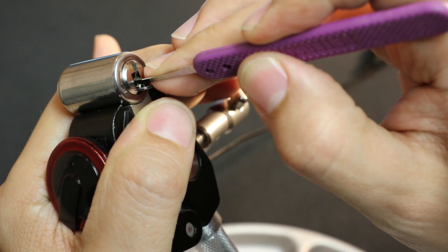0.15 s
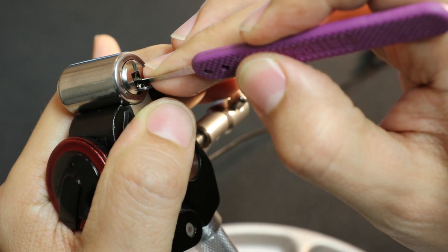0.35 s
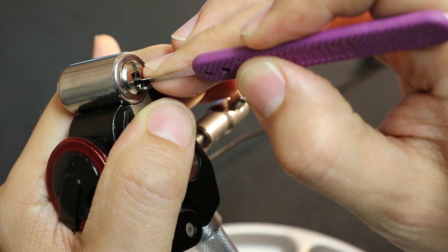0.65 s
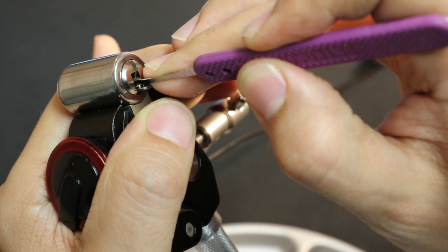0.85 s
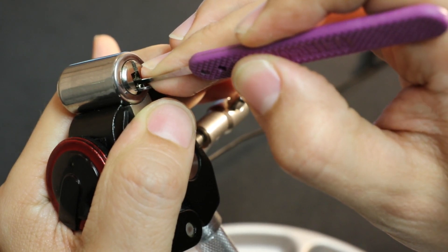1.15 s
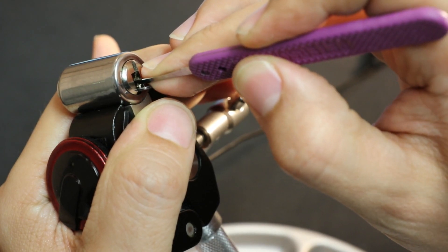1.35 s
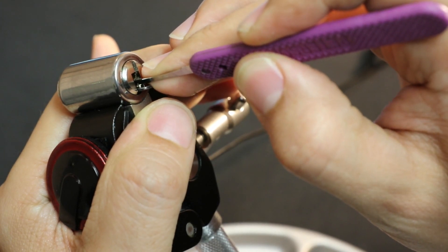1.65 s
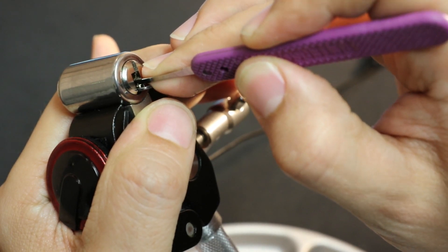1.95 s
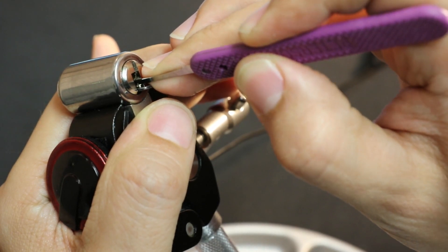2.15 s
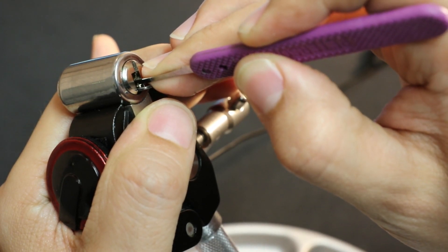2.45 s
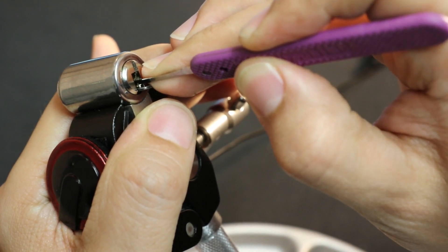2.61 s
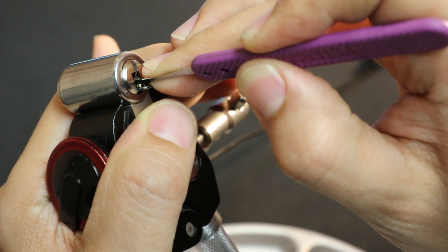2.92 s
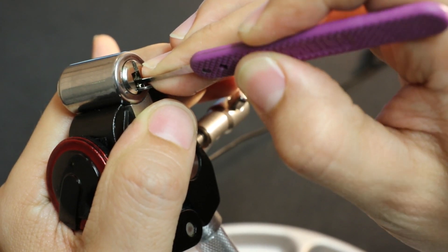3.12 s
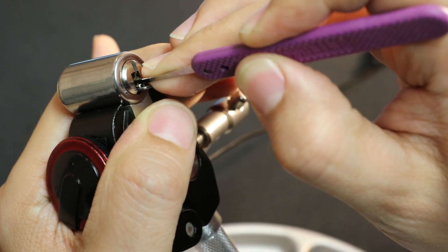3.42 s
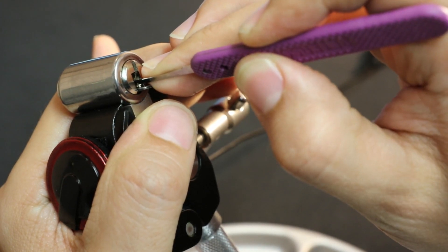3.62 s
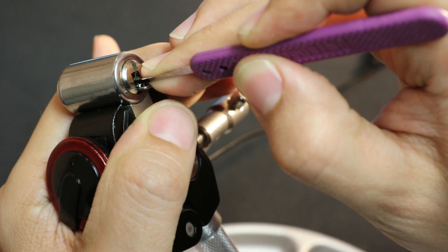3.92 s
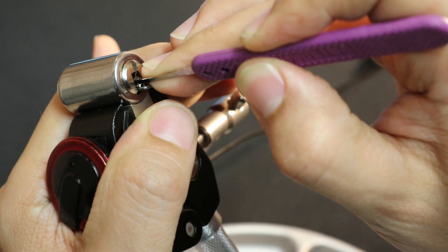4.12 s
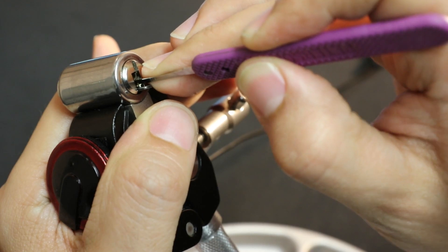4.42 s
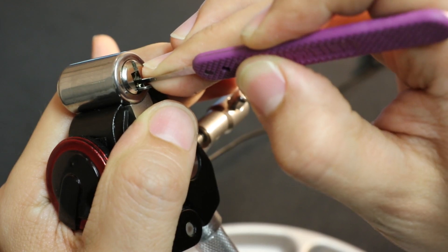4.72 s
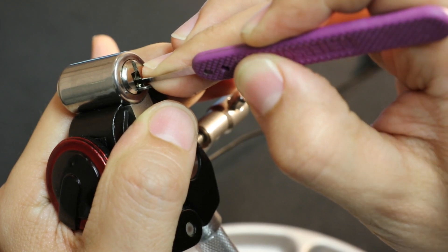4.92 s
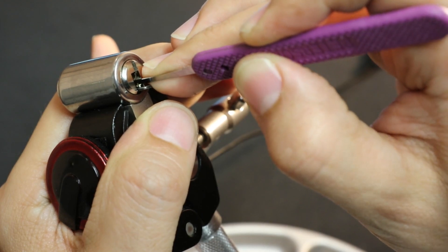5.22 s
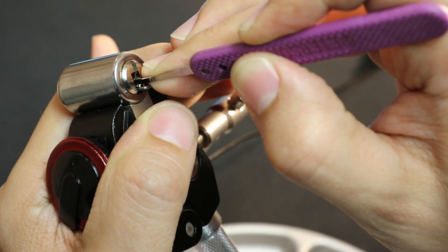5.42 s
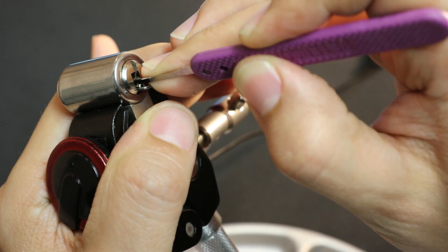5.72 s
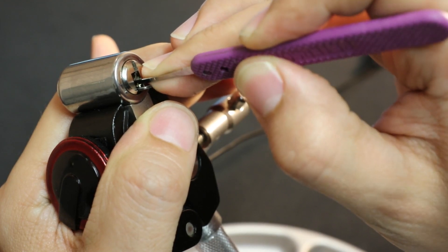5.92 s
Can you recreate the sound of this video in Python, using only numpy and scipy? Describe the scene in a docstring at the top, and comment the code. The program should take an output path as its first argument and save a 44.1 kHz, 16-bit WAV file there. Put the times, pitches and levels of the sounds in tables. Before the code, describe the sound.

A metal pick works a small lock: sharp little snaps, soft ticks and brief scratchy rubs over faint hiss and low mains hum.

```python
"""Sharp little snaps, soft ticks and brief rubs stand out over faint hiss and mains hum.
A hook pick lifts the pins of a small hand-held cylinder lock: each snap rings pick and metal parts as decaying sines.
Light touches ring the pick alone, and filtered random grains make the rubs and scratches in the keyway.
A close mono microphone hears the dull ring; a farther stereo pair adds the bright snap and the room a moment later.
"""
import sys
import numpy as np
from scipy import signal
from scipy.fft import rfft, irfft, next_fast_len
from scipy.io import wavfile

SR = 44100
rng = np.random.default_rng(int(sys.argv[2]) if len(sys.argv) > 2 else 0)


def persist_wave(psi):
    """Save psi, clipped to +-1, as 16-bit WAV."""
    counts = np.round(np.clip(psi, -1, 1) * 32767).astype(np.int16)
    wavfile.write(sys.argv[1], SR, np.atleast_2d(counts).T)


N = 267025
TIME = np.arange(N) / SR  # seconds


def from_db(db):
    """Turn decibels into gain."""
    return 10 ** (np.asarray(db) / 20)


def rms_one(x):
    """Scale a sound to an rms of 1."""
    return x / np.sqrt(np.mean(x ** 2) + 1e-20)


def at_hz(points, hz):
    """Read a curve between its points, along a log-frequency axis."""
    known_hz, values = np.transpose(points)
    return np.interp(np.log(hz + 1e-3), np.log(known_hz), values)


def band(x, low_hz, high_hz, order=2):
    """Keep one frequency band, without looking ahead in time."""
    edges_hz = [low_hz, min(high_hz, 0.45 * SR)]
    sos = signal.butter(order, edges_hz, "band", fs=SR, output="sos")
    return signal.sosfilt(sos, x + 1e-18)


def add(out, s, sound):
    """Mix a short sound in at a given second."""
    start = round(s * SR)
    out[start:start + len(sound)] += sound[:N - start]


def swells(rows):
    """Bell-shaped level bumps from rows of centre (s), half length (s) and peak (dB)."""
    return sum(from_db(db) * np.exp(-((TIME - s) / half) ** 2) for s, half, db in rows)


def stereo_noise(spectrum, likeness):
    """Shape noise to a given spectrum; a shared part makes left and right alike, an opposite part unlike."""
    size = next_fast_len(N)
    hz = np.fft.rfftfreq(size, 1 / SR)
    mid, side = rfft(rng.standard_normal((2, size)))
    alike = np.clip(at_hz(likeness, hz), -1, 1)
    pair = np.sqrt(1 + alike) * mid + np.sqrt(1 - alike) * side * [[1], [-1]]
    density = from_db(at_hz(spectrum, hz)) * np.sqrt(SR) / 2
    return irfft(pair * density)[:, :N]


def background():
    """Steady room noise, mains hum made of sines, and a few soft swells of low-pitched noise."""
    # Quiet room noise. Each row: frequency in Hz, level in dB per Hz.
    floor = [(12, -74), (25, -70), (42, -80.5), (55, -95), (80, -88), (110, -91), (140, -99), (175, -90),
             (260, -103), (500, -106), (1000, -111), (2000, -115.5), (5000, -118), (16000, -118.5)]
    # How alike the two channels are. Each row: frequency in Hz, likeness (1 = identical).
    likeness = [(30, 0.11), (200, 0.47), (6000, 0.41), (9000, 0.998)]
    # Mains hum. Each row: frequency in Hz, left level in dB, right level in dB, right lag in radians.
    hum_tones = [(59.7, -52.5, -59, 1.84), (121, -75.5, -65, 0.16), (176.4, -71, -91, 1)]
    # Soft low rumbles. Each row: centre in seconds, half length in seconds, level in dB.
    rumble_swells = [(2.38, 0.028, -60.5), (2.53, 0.083, -56), (3.96, 0.036, -56)]
    hum = np.zeros((2, N))
    for hz, left_db, right_db, lag in hum_tones:
        phase = 2 * np.pi * hz * TIME - np.array([[0], [lag]])
        hum += from_db([[left_db], [right_db]]) * np.sin(phase)
    low_noise = rms_one(band(rng.standard_normal(N), 74.4, 120.8, order=3))
    rumble = swells(rumble_swells) * low_noise
    return stereo_noise(floor, likeness) + hum + rumble


def room(x, early_t60, tail_t60, tail_db, alike=0.36, build_s=0.001):
    """Dense reflections from hands and desk build up, then die into the short tail of a small room."""
    t = TIME[:SR // 3]
    mid, side = rng.standard_normal((2, len(t)))
    alike = np.clip(alike, -1, 1)
    echoes = np.sqrt(1 + alike) * mid + np.sqrt(1 - alike) * side * [[1], [-1]]
    # t60: seconds to fall by 60 dB
    decay = from_db(-60 * t / early_t60) + from_db(tail_db - 60 * t / tail_t60)
    response = rms_one(echoes * contact(decay, build_s)) / np.sqrt(len(t))
    return signal.fftconvolve(x[None], response, axes=1)[:, :N]


def distant_pair(body, steel, crack):
    """The stereo pair is farther off, brighter and late; steel and crack are louder on the right."""
    lag_s = 0.0188
    # small parts radiate their upper modes best into the air
    wet = room(band(body, 2400, 3200), early_t60=0.06926, tail_t60=0.11, tail_db=-13.0, alike=0.7)
    wet += from_db(-23.5) * room(body, early_t60=0.042, tail_t60=0.094, tail_db=-17.5, alike=0.62)
    # the room's low modes boom faintly
    low = band(body, 160, 300)
    wet += from_db(3.5) * room(low, early_t60=0.14, tail_t60=0.27, tail_db=-13, alike=0.23)
    # left and right gains in dB
    wet += from_db([[-3], [-1]]) * room(steel, early_t60=0.05, tail_t60=0.24, tail_db=-24.0, alike=0.2)
    wet += from_db([[8], [13.5]]) * room(crack, early_t60=0.059, tail_t60=0.19, tail_db=-20.5, alike=0.05)
    return np.array([np.interp(TIME - lag_s, TIME, side, left=0) for side in wet])


def close_microphone(body, steel):
    """Mono: the direct ring and a faint wash of nearby reflections."""
    steel_band = band(steel, 2300, 5000, order=1)
    wash = room(steel_band, early_t60=0.078, tail_t60=0.11, tail_db=-24.0)[0]
    return body + steel + from_db(-11) * wash


def rubbing():
    """Friction grains excite narrow pick and barrel resonances (the rub) and wider bands (the scratch)."""
    # The pick sliding in the keyway.
    # Each row: centre in seconds, half length in seconds, level in dB before the losses below.
    strokes = [(0.039, 0.053, -71), (0.754, 0.029, -75.5), (1.138, .065, -81.5), (1.309, .004, -70),
               (1.358, .009, -66.5), (2.108, .004, -65), (2.355, 0.0054, -69), (3.196, 0.031, -69.5),
               (3.509, 0.0095, -66), (4.5, 0.015, -62), (5.298, 0.07, -79.5)]
    # every stroke carries a wide scratch; short catches lose most of the narrow rub
    CATCH_S = 0.013  # half length where a stroke is midway between catch and glide
    CATCH_RUB_DB, GLIDE_SCRATCH_DB = -19, -1.5  # change of the rub in a catch, of the scratch in a glide
    grains = rng.standard_normal(N) * (rng.random(N) < 1500 / SR)  # about 1500 per second
    s, half, db = np.transpose(strokes)
    caught = 1 / (1 + (half / CATCH_S) ** 4)  # near 1 for short strokes, near 0 for long ones
    rub_db = db + CATCH_RUB_DB * caught
    scratch_db = db + GLIDE_SCRATCH_DB * (1 - caught)
    rub = rms_one(band(grains, 915, 1090) + from_db(-8) * band(grains, 1500, 1615))
    scratch = rms_one(band(grains, 320, 1230) + from_db(-12.5) * band(grains, 2650, 3460))
    return swells(zip(s, half, rub_db)) * rub + swells(zip(s, half, scratch_db)) * scratch


def contact(sound, rise_s):
    """The force of a contact builds up over a short time."""
    return sound * (1 - np.exp(-TIME[:len(sound)] / rise_s))


def touches(glide=0.092, settle_s=0.0051):
    """Soft touches ring only the pick; its pitch sinks as the pressure eases."""
    # Light touches of the pick. Each row: start in seconds, level in dB before TICK_GAIN_DB.
    ticks = [(1.4626, -66), (2.3436, -58.5), (3.4745, -66), (3.7933, -61), (3.9479, -58.5), (3.9943, -64),
             (4.1046, -61.5), (4.1794, -67), (4.5974, -64), (5.015, -61.5), (5.1442, -59), (5.4919, -65.5)]
    TICK_HZ, TICK_T60_S, TICK_GAIN_DB = 1160, 0.025, 5  # TICK_HZ is the middle of the pitch glide
    FAINT_TICKS_PER_S, FAINT_TICK_DB = 0.8, -66  # the smallest touches come at random
    out, t = np.zeros(N), TIME[:SR // 10]
    # adding up the sliding pitch gives the phase
    cycles_per_hz = np.cumsum(1 + glide * (np.exp(-t / settle_s) - 0.5)) / SR
    tone = np.sin(2 * np.pi * TICK_HZ * cycles_per_hz)
    tick = contact(from_db(-60 * t / TICK_T60_S) * tone, rise_s=0.00121)
    for s, db in ticks:
        add(out, s, from_db(db + TICK_GAIN_DB) * tick)
    for s in TIME[rng.random(N) < FAINT_TICKS_PER_S / SR]:
        add(out, s, from_db(FAINT_TICK_DB) * tick)
    return out


def ring(modes, scatter_db=0.0):
    """Decaying sines after one blow; neighbouring modes swing in opposite directions."""
    hz, db, t60 = np.transpose(modes)[:, :, None]
    t = TIME[:SR // 4]
    sign = (-1) ** np.arange(len(modes))[:, None]
    strength_db = db + scatter_db * rng.standard_normal(hz.shape)
    envelope = from_db(strength_db - 60 * t / t60)
    return np.sum(sign * envelope * np.sin(2 * np.pi * hz * t), axis=0)


def dull_knock(hz):
    """The gripping hand damps the lowest motion within a few cycles: a band an octave wide, peak 1."""
    knock = band(signal.unit_impulse(SR // 10), hz / np.sqrt(2), hz * np.sqrt(2))
    return knock / np.max(np.abs(knock))


def pins():
    """Each snap rings the pick, the barrel, its housing and the small steel parts, and sends a crack into the air."""
    # Pins snapping. Each row: start in seconds, force in dB, hardness of the contact from 0 to 1,
    # share reaching the barrel in dB, thud pitch in Hz, thud share in dB.
    clicks = [(0.0203, -58, 0.95, -3, 402, 8.5), (0.2702, -37, 0.25, .5, 324, -13),
              (0.9132, -37.5, 0.67, 5.5, 775, -26), (2.2196, -53, 0.4, 12.5, 700, -15),
              (2.2317, -46, 0.99, 6.5, 880, -28), (2.8511, -43.5, 0.98, -12, 754, -9),
              (4.4857, -52.5, 0.1, -6, 600, -7), (4.502, -50, .15, -14.5, 680, -6),
              (4.5561, -51, 0.94, 1, 604, -4), (4.7435, -30.5, .97, 11, 298.3, -11.5),
              (5.7412, -20, 1.0, 10, 833, 1.5)]
    # Ringing modes of the three metal parts, before each snap reshapes and scales them.
    # Each row: frequency in Hz, level in dB, time to fall by 60 dB in seconds.
    barrel_modes = [(1543, 2, 0.0265), (1990, -22, 0.013)]
    housing_modes = [(228, -6.5, 0.39), (486, -8, 0.29), (628, -12.5, 0.25), (755, 1, 0.14),
                     (1117, 1.5, 0.094), (1195, 5.5, 0.075), (1330, -3.5, 0.21), (2449, -20.5, .13),
                     (2475, -23.5, 0.18), (2642, -13.5, 0.089), (2780, -19.5, 0.097), (2940, -20, .1)]
    steel_modes = [(2100, -12, .006), (2770, -7.5, 0.014), (3126, -4.5, 0.0079), (3550, -9.5, 0.012),
                   (4070, 0, 0.0085), (4592, -6.5, 0.0051), (5640, -17, 0.0093), (6110, -17.5, 0.01),
                   (6830, -10.5, 0.0083), (7755, -14, 0.012), (9446, -22.5, .008)]
    PICK_HZ, PICK_STIFFENING_HZ = 1009.5, 3190  # unloaded pitch, and its rise per unit of force
    PICK_T60_S = 0.03
    REBOUND_CYCLES, REBOUND_DB = 6, -1.5  # the pick bounces back and is struck again after so many swings
    HOUSING_DB, HOUSING_FOLLOWS = -15.5, 0.25  # level against the force; part of the barrel's share taken on
    BELOW_THUD_DB = -15.5  # per octave: housing modes lower than the thud are barely stirred
    STEEL_DB, STEEL_SOFT_LOSS_DB = 1.5, 23  # level against the force at hardness 1; loss at hardness 0
    CRACK_DB, CRACK_SOFT_LOSS_DB = 1.5, 139.5  # the same for the airborne crack
    TILT_HARD_DB, TILT_SOFT_DB = 1, -12.5  # steel brightness per octave at hardness 1 and 0
    body, steel, crack = np.zeros((3, N))
    for s, force_db, hardness, barrel_db, thud_hz, thud_db in clicks:
        soft = 1 - np.clip(hardness, 0, 1)
        # a loaded pick is stiffer and rings higher
        pick_hz = PICK_HZ + PICK_STIFFENING_HZ * from_db(force_db)
        pick = contact(ring([(pick_hz, force_db, PICK_T60_S)]), rise_s=0.00033)
        add(body, s, pick)
        add(body, s + REBOUND_CYCLES / pick_hz, from_db(REBOUND_DB) * pick)
        barrel = contact(ring(barrel_modes), rise_s=0.00033)
        add(body, s, from_db(force_db + barrel_db) * barrel)
        stirred = [(hz, db + BELOW_THUD_DB * max(np.log2(thud_hz / hz), 0), t60)
                   for hz, db, t60 in housing_modes]
        housing_db = force_db + HOUSING_DB + HOUSING_FOLLOWS * barrel_db
        add(body, s, from_db(housing_db) * contact(ring(stirred), rise_s=0.001))
        add(body, s, from_db(force_db + thud_db) * dull_knock(thud_hz))
        # a harder contact favours the upper steel modes; only the hardest contacts crack
        brightness = TILT_HARD_DB + soft * (TILT_SOFT_DB - TILT_HARD_DB)
        tilted = [(hz, db + brightness * np.log2(hz / 4000), t60) for hz, db, t60 in steel_modes]
        steel_db = force_db + STEEL_DB - soft * STEEL_SOFT_LOSS_DB
        add(steel, s, from_db(steel_db) * contact(ring(tilted, scatter_db=-0.3), rise_s=0.00036))
        # the crack starts as a single-sample pulse
        add(crack, s, from_db([force_db + CRACK_DB - soft * CRACK_SOFT_LOSS_DB]))
    return body, steel, band(crack, 4500, 16000)


def scene():
    """The close microphone in the centre, the distant pair around it, and the background."""
    body, steel, crack = pins()
    body = body + touches() + rubbing()
    return close_microphone(body, steel) + distant_pair(body, steel, crack) + background()


def record(dry):
    """Cut the treble steeply above 15.9 kHz."""
    sos = signal.ellip(12, 0.1, 80, 15900, fs=SR, output="sos")
    return signal.sosfilt(sos, dry)


dry = scene()
out = record(dry)
persist_wave(out)
```